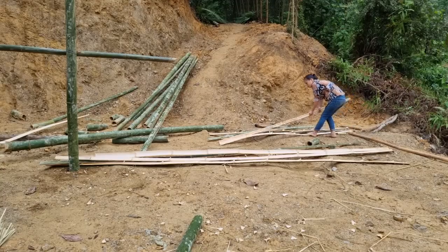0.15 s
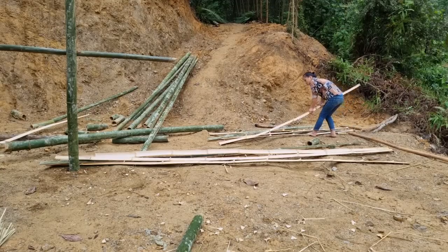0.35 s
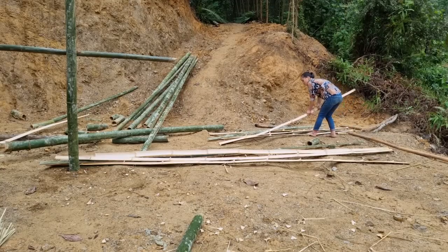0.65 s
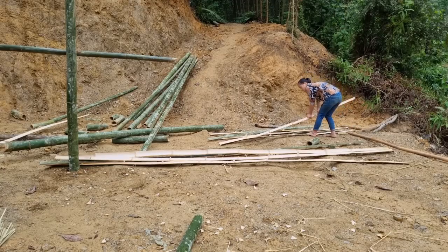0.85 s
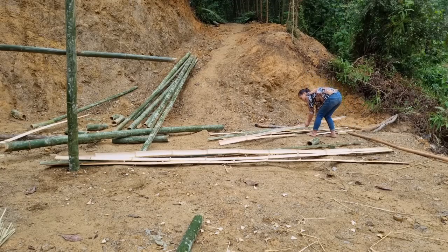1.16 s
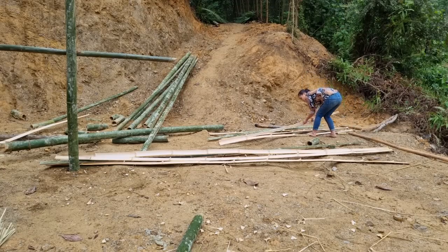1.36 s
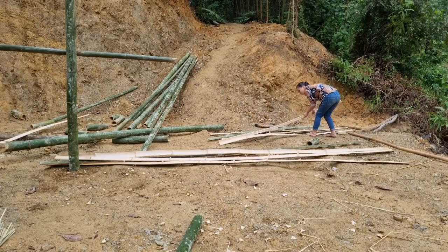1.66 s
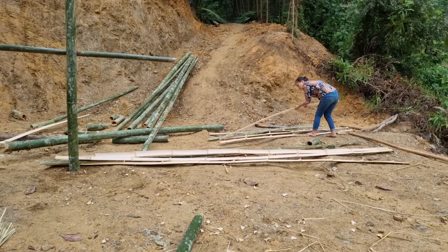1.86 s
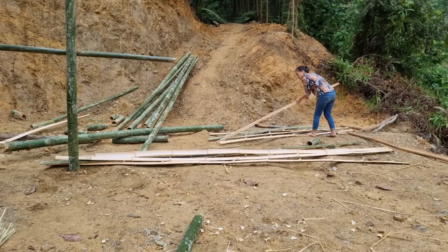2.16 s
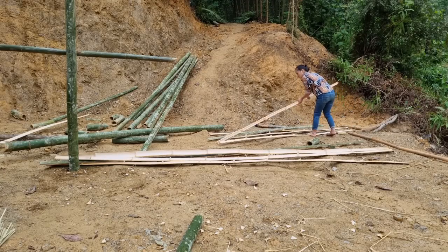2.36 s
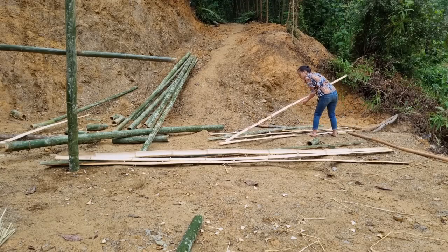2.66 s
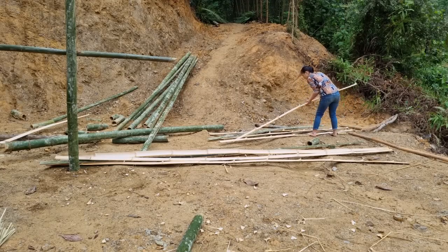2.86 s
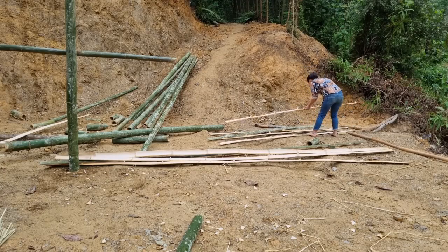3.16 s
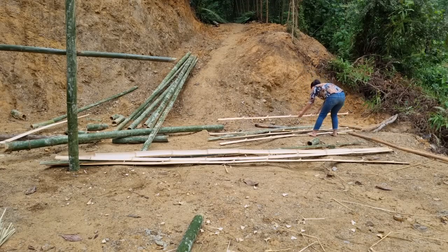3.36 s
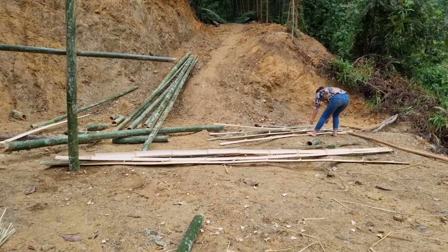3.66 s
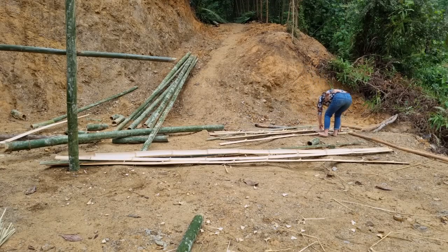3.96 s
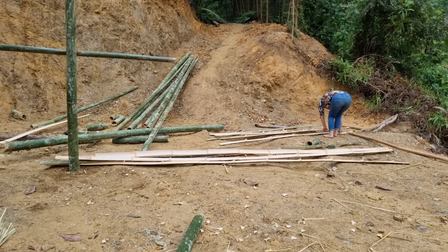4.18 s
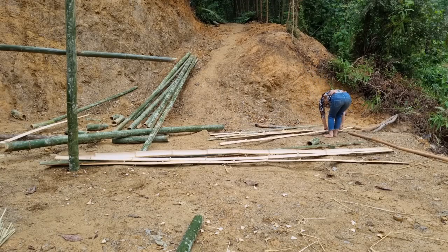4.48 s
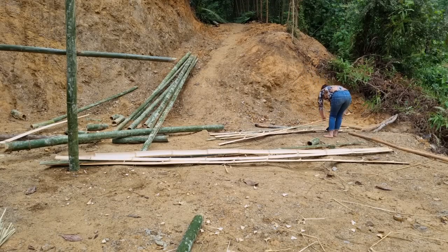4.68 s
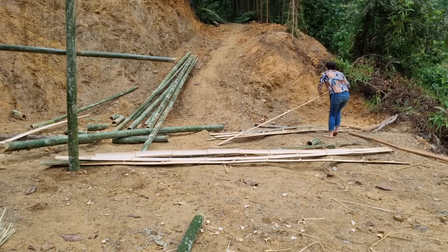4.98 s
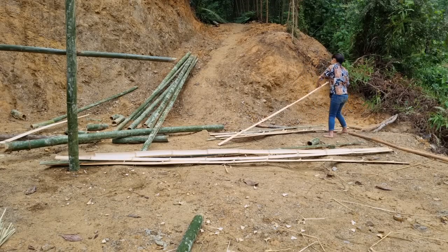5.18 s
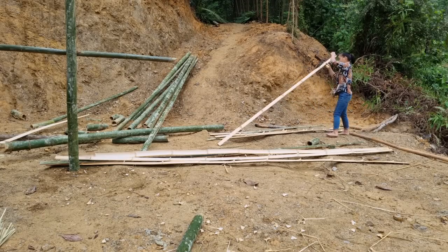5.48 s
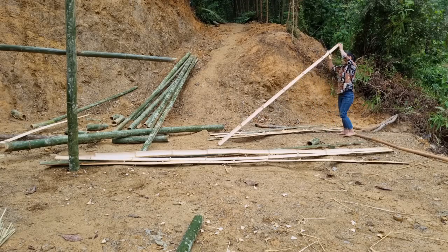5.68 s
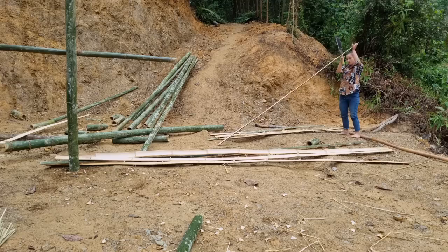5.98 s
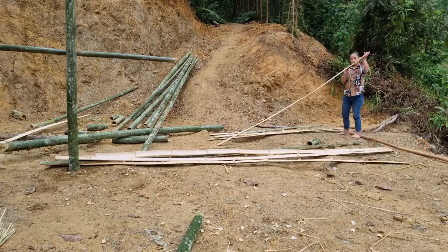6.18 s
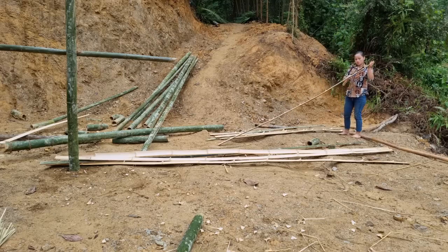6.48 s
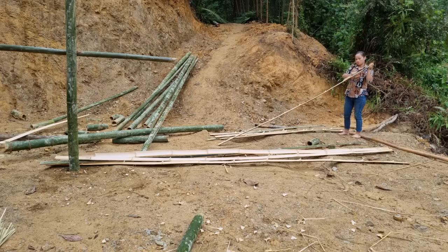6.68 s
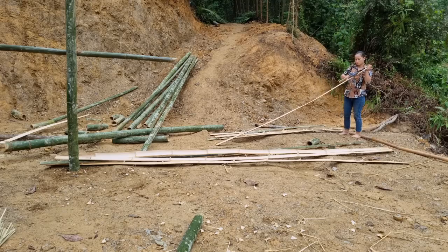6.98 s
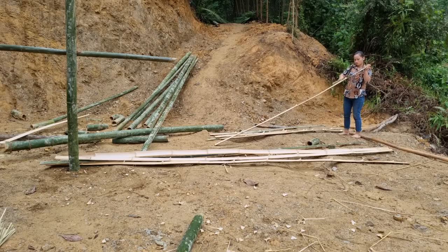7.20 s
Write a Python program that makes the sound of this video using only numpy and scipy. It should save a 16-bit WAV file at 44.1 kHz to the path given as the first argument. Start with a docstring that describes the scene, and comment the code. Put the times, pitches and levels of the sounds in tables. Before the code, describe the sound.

Split bamboo strips clatter onto a pile outdoors while a nearby hen clucks and whines over a faint hiss of insects.

```python
"""Insects hiss at a forest edge as a hen clucks close on the right and split bamboo clatters on a pile.
Each contact cracks, chatters and rings the cane; dropped strips also bounce, thud and flap on the earth.
The hen's clucks are uneven pulses through her throat, her whines nearly pure held notes with a rasp.
A far bird chips steadily and chicks peep in falling whistles. The yard adds scatter and a faint echo."""
import sys
import numpy as np
from scipy import signal
from scipy.fft import rfft, irfft, next_fast_len
from scipy.io import wavfile

SR = 44100
rng = np.random.default_rng(int(sys.argv[2]) if len(sys.argv) > 2 else 0)


def unload_wav(signal):
    """Save mono or channel-first audio to the path in sys.argv[1] as 16-bit WAV at rate SR, clipped to [-1, 1]."""
    wavfile.write(
        sys.argv[1],
        SR,
        np.round(np.clip(np.atleast_2d(signal).T, -1, 1) * 32767).astype(np.int16),
    )


N = 323694
TIME = np.arange(N) / SR


def from_db(db):
    """Decibels to gain."""
    return 10 ** (np.asarray(db) / 20)


def unit_rms(x):
    """Scale to rms 1."""
    return x / np.sqrt(np.mean(x ** 2) + 1e-20)


def at_hz(points, hz):
    """Read a table on a log-frequency axis."""
    f, value = np.transpose(points)
    return np.interp(np.log(np.maximum(hz, 1)), np.log(f), value)


def bump(x, centre, width):
    """Bell curve of height 1."""
    return np.exp(-((x - centre) / width) ** 2)


def add(out, start_s, x):
    """Mix x in at start_s."""
    i = round(start_s * SR)
    x, i = x[..., max(-i, 0):], max(i, 0)
    out[..., i:i + x.shape[-1]] += x[..., :max(N - i, 0)]


def colour(x, spectrum, modes=()):
    """Minimum-phase filter of unit power gain: a spectrum plus resonances."""
    size = 2 * next_fast_len(x.shape[-1] // 2 + 1)
    hz = np.fft.rfftfreq(size, 1 / SR)
    modes_db = sum(lift_db / (1 + (2 * (hz - f) / width_hz) ** 2) for f, width_hz, lift_db in modes)
    gain = unit_rms(from_db(at_hz(spectrum, hz) + modes_db))
    cepstrum = irfft(np.log(gain))
    cepstrum[1:size // 2] *= 2
    cepstrum[size // 2 + 1:] = 0
    return irfft(rfft(x, size) * np.exp(rfft(cepstrum)))[..., :x.shape[-1]]


def drift(rate_hz, size=N):
    """Smooth random curve, spread about 1."""
    knots = rng.standard_normal(size // 8 + 2)
    return np.interp(np.arange(size) * rate_hz / SR, np.arange(len(knots)), knots)


def stereo_noise(size, correlation):
    """White noise in two partly correlated channels."""
    mid, side = rng.standard_normal((2, size))
    return np.sqrt((1 + correlation) / 2) * mid + np.sqrt((1 - correlation) / 2) * side * [[1], [-1]]


def from_right(x, lag_ms, pan_db):
    """Sound from the right reaches the left later; pan_db is left minus right."""
    t = TIME[:len(x)]
    left = np.interp(t - lag_ms / 1000, t, x)
    return np.array([left * from_db(pan_db / 2), x * from_db(-pan_db / 2)])


# insect hiss and outdoor hush spectra: f/Hz, level/dB
INSECT_SPECTRUM = [(1300, -27), (1650, -16), (1950, -25), (2400, -3.5), (3200, -2), (5000, -5.5),
                   (5700, -1.5), (6500, -15), (8000, -10), (9200, -27.5), (15000, -24.5)]
HUSH_SPECTRUM = [(25, -22), (48, 4), (75, 7), (150, -4.5), (500, -12.5), (1100, -15), (2500, -10),
                 (8000, -24)]


def forest(insect_db=-59, hush_db=-75, flutter_db=0.84):
    """Insects all around, over a faint low hush."""
    hiss = colour(stereo_noise(N, .1), INSECT_SPECTRUM)
    insects = hiss * from_db(insect_db + flutter_db * drift(22)) * from_db([[-.8], [.8]])
    return insects + from_db(hush_db) * colour(stereo_noise(N, .61), HUSH_SPECTRUM)


# single clucks: t/s, length/s, f/Hz, level/dB, roughness/0-1
HEN_CLUCKS = [(.483, 0.058, 477, -39, 0.22), (1.112, 0.049, 380.7, -30.5, 0.24),
              (2.433, .051, 364, -35.5, 0.24), (3.175, 0.063, 442, -43.5, 0.52),
              (3.461, 0.071, 413, -43.5, 0.42), (4.072, 0.049, 382.3, -27, 0.38),
              (4.469, .064, 448.5, -44.5, 0.75), (5.49, 0.038, 363.4, -37, 0.71),
              (6.439, 0.089, 445, -55, 0.76)]
# throat response: f/Hz, level/dB
THROAT_SPECTRUM = [(150, -12), (380, -13), (750, -4.5), (1100, 10), (1450, -10.5), (1850, -25.5),
                   (3200, -14), (5000, -19.5), (8000, -25.5), (15000, -51.5)]


def clucks(arch=.1, sag=.11):
    """Uneven pulses through the throat: single clucks, a soft one before each whine, one at its end."""
    leads = [(s - .12, .074, 465.4, db - 12, .47) for s, _, _, db, *_ in HEN_WHINES]
    endings = [(s + held_s - .019, .0319, 464.6, db - 9.5, .416) for s, held_s, _, db, *_ in HEN_WHINES]
    out = np.zeros(N)
    for start_s, length_s, pitch_hz, level_db, roughness in list(HEN_CLUCKS) + leads + endings:
        progress = np.minimum(TIME[:SR // 8] / length_s, 1)
        effort = np.sin(np.pi * progress)
        jitter = .25 * roughness * drift(500, len(progress))
        hz = pitch_hz * (1 + arch * (effort - 1) - sag * (progress - .5) + jitter)
        phase = 2 * np.pi * np.cumsum(hz) / SR
        pulses = unit_rms(sum(np.cos(k * phase) for k in range(1, 14)))
        air = 1.1 * roughness * rng.standard_normal(len(progress)) * (1 + np.cos(phase))
        add(out, start_s, from_db(level_db) * unit_rms(colour(pulses + air, THROAT_SPECTRUM)) * effort)
    return out


# handling contacts: t/s, level/dB, rattle t60/s, body (under 800 Hz)/dB
STRIP_TAPS = [(.029, -31, 0.062, -13.5), (1.718, -28.5, .07, -21.5), (1.728, -27, 0.085, -17),
              (1.741, -14.5, 0.037, -23.5), (2.223, -47.5, 0.01, -14), (2.448, -31.5, 0.075, -6.5),
              (3.72, -45.5, 0.23, 3.5), (4.585, -51.5, 0.13, -17), (4.611, -50.5, 0.11, -21),
              (5.091, -53.5, 0.25, 5.5), (5.5, -57.5, 0.16, 8)]
# dropped strips: t/s, hit/dB, rattle t60/s, body/dB, slap delay/s, slap/dB, flap/dB, flap t60/s
STRIP_DROPS = [(1.746, -13, 0.087, -18, 0.016, -34, -40, 0.6),
               (2.114, -57.5, 0.093, -18, 0.0055, -66, -53, 0.32),
               (3.528, -20, 0.11, -9, 0.03, -21.5, -49, 2.56),
               (3.854, -36.5, .11, -6.5, .023, -28, -55.5, 0.97),
               (4.694, -66, 0.45, -6, 0.013, -68, -64.5, 0.8),
               (6.794, -23.5, 0.066, -12, .018, -30.5, -50, 0.32),
               (7.183, -23.5, 0.065, -13, 0.011, -32.5, -46, 0.27)]


def contacts(slap_body_db=-2.5, slap_t60_ratio=1.15, bounce_gap_s=.044, bounce_body_db=-1.5):
    """All contacts, in tap columns: a dropped strip lands on one end, slaps flat and bounces twice."""
    rows = list(STRIP_TAPS)
    for start_s, hit_db, t60_s, body_db, delay_s, slap_db, _, _ in STRIP_DROPS:
        rows.append((start_s, hit_db, t60_s, body_db))
        rows.append((start_s + delay_s, slap_db, t60_s * slap_t60_ratio, slap_body_db))
        for k, loss_db in enumerate((11, 19), 1):
            bounce_s = start_s + delay_s + bounce_gap_s * (k + rng.uniform(-.1, .09))
            rows.append((bounce_s, slap_db - loss_db, t60_s, bounce_body_db))
    return rows


# split cane resonances: f/Hz, width/Hz, lift/dB
CANE_MODES = [(1157, 260, 1), (1500, 450, -2), (2350, 150, 0), (3120, 250, 3.5), (3563, 250, -1.5),
              (4600, 270, 0), (5450, 300, 2.5), (7930, 460, 5)]


def bamboo(crack_gain=2.2, crack_s=.00099, rise_s=.00073, ring_width_hz=55, ring_db=6, pan_db=.3):
    """Each contact cracks, then the strips chatter; both ring the cane and the contact's bending modes."""
    out, t = np.zeros((2, N)), TIME[:SR // 4]
    for start_s, level_db, t60_s, body_db in contacts():
        splinter_db = -16 - .91 * body_db   # heavier contact, less top above 9 kHz
        chatter = unit_rms(from_db(3.5 * drift(600, len(t)))) * from_db(-60 * t / t60_s)
        crack = crack_gain * np.exp(-t / crack_s)
        bending_hz = np.geomspace(450, 7000, 16) * np.exp(rng.normal(0, .06, 16))
        bending = [(hz, ring_width_hz, ring_db) for hz in bending_hz]
        for force, top_db in (crack, splinter_db + 3), (chatter, splinter_db - 4):
            spectrum = [(20, body_db - 17), (70, body_db - 4), (280, body_db - 3), (450, body_db),
                        (750, body_db), (1200, -1.5), (8300, -1.5),
                        (9400, top_db), (16000, 1.5 * top_db - .5)]
            blow = stereo_noise(len(t), .3) * force * (1 - np.exp(-t / rise_s))
            add(out, start_s, from_db(level_db) * colour(blow, spectrum, CANE_MODES + bending))
    return out * from_db([[pan_db / 2], [-pan_db / 2]])


# held notes: t/s, length/s, f/Hz, level/dB, yelp/Hz, sag/Hz, overtones/dB, L-R/dB
HEN_WHINES = [(.133, 0.2, 590, -31, 19.5, 9.7, -45, -2.5), (2.753, 0.22, 588.6, -33, 48, 19, -48.5, 1.5),
              (4.028, .187, 586.2, -34, 2, 16.5, -42.5, 0), (6.768, 0.21, 587, -34.5, 3, 9.5, -51, -2.5),
              (7.208, 0.13, 590.2, -30, 6.5, 1, -44.5, -3.5)]
# upper harmonics: harmonic number, relative level/dB
WHINE_OVERTONES = [(3, -5), (4, 1), (5, -15), (6, -26), (8, -21.5), (12, -21)]


def whines(attack_s=.015, release_s=.048, yelp_at_s=.031, scoop_hz=28, scoop_s=.00763, jitter=.0028,
           crack_db=-5, fade_db_per_s=9.5, fundamental_db=-16, rasp_db=-19, shimmer_db=3):
    """A held note yelps, sags and recovers; the throat lifts harmonic 2, air rasps with each cycle."""
    out, t = np.zeros((2, N)), TIME[:SR // 4]
    for start_s, length_s, pitch_hz, level_db, yelp_hz, sag_hz, upper_db, pan_db in HEN_WHINES:
        remaining_s = np.maximum(length_s - t, 0)
        hz = pitch_hz + yelp_hz * bump(t, yelp_at_s, .011) - sag_hz * bump(t / length_s, .45, .212)
        hz -= scoop_hz * np.exp(-np.minimum(t, remaining_s) / scoop_s)   # flat at both ends
        phase = 2 * np.pi * np.cumsum(hz * (1 + jitter * drift(250.8, len(t)))) / SR
        effort = np.minimum(t / attack_s, 1) * np.minimum(remaining_s / release_s, 1)
        # the voice cracks atop the yelp, fully from 23 Hz of overshoot
        effort *= from_db(crack_db * min(yelp_hz / 23, 1) * bump(t, yelp_at_s, .0048))
        breath = from_db(level_db - fade_db_per_s * (t - length_s / 2))
        voice = breath * (from_db(fundamental_db) * np.sin(phase) + np.sin(2 * phase))
        overtones = sum(from_db(db + 2 * drift(40, len(t))) * np.sin(k * phase)
                        for k, db in WHINE_OVERTONES)
        voice += from_db(upper_db) * np.minimum(t / .052, 1) * overtones
        air = from_db(level_db + rasp_db) * rasp(phase)
        note = (np.sqrt(2) * voice + air) * effort * from_db(shimmer_db * drift(66.7, len(t)))
        add(out, start_s, from_right(note, lag_ms=.59, pan_db=pan_db))
    return out


# air in the hen's voice: f/Hz, level/dB
RASP_SPECTRUM = [(300, -15), (1200, 0.5), (1900, -4.5), (3000, 0.5), (5000, -3), (7300, -6.5),
                 (9000, -14.5), (15000, -22)]


def rasp(phase, onset_db=8, settle_s=.022):
    """Breath noise pulsed by the voice; starts rough and settles."""
    t = TIME[:len(phase)]
    puffs = rng.standard_normal(len(t)) * (1 + .39 * np.sin(phase))
    return from_db(onset_db * np.exp(-t / settle_s)) * colour(puffs, RASP_SPECTRUM)


def whistle(glide_s, start_hz, end_hz, waver=.008, hold_s=0):
    """A wavering note eases from its first pitch to its last and may hold it."""
    t = TIME[:SR // 2]
    ease = (1 - np.cos(np.pi * np.minimum(t / glide_s, 1))) / 2
    hz = (start_hz + (end_hz - start_hz) * ease) * (1 + waver * drift(300, len(t)))
    swell = np.abs(np.sin(np.pi * np.minimum(t / (glide_s + hold_s), 1)))
    return np.sqrt(2 * swell) * np.sin(2 * np.pi * np.cumsum(hz) / SR)


def far_bird(level_db=-62, count=21, first_s=.378, gap_s=.3305, slowing_s=.00058):
    """One quick falling chip repeats, each gap slightly longer."""
    out = np.zeros(N)
    for k in range(count):
        chip = whistle(glide_s=.048, start_hz=5250, end_hz=3600)
        add(out, first_s + k * gap_s + slowing_s * k * k / 2, from_db(level_db) * chip)
    return out


# chick peeps: t/s, glide/s, start f/Hz, level/dB
CHICK_PEEPS = [(0.704, .11, 3460, -56.5), (1.179, 0.086, 3570, -56), (1.964, 0.13, 3040, -62),
               (2.517, .1, 3480, -54.5), (2.849, 0.12, 3880, -55.5), (4.24, 0.12, 3600, -57),
               (4.596, 0.15, 3650, -57.5)]


def chicks(end_hz=2123):
    """Each peep glides down, then holds its last pitch."""
    out = np.zeros(N)
    for start_s, glide_s, start_hz, level_db in CHICK_PEEPS:
        add(out, start_s, from_db(level_db) * whistle(glide_s, start_hz, end_hz, waver=.035, hold_s=.035))
    return out


# stray thin notes: t/s, length/s, start f/Hz, end f/Hz, level/dB
THIN_NOTES = [(0.773, 0.2, 4924, 4900, -66), (4.328, 0.033, 1633, 1451, -54),
              (5.807, .016, 1528, 1690, -53)]


def thin_notes():
    """One faint steady high tone and two short low pips."""
    out = np.zeros(N)
    for start_s, length_s, start_hz, end_hz, level_db in THIN_NOTES:
        add(out, start_s, from_db(level_db) * whistle(length_s, start_hz, end_hz))
    return out


# flapping strip and earth thud spectra: f/Hz, level/dB
FLAP_SPECTRUM = [(25, -16), (50, -21), (82, -6), (115, -11), (200, -20), (600, -39)]
THUD_SPECTRUM = [(25, -59.5), (55, -19.5), (110, -13.5), (170, -1.5), (280, -11), (480, -14.5), (1200, -41)]


def flapping(lead_s=.0066, swing_rise_s=.025, thud_rise_s=.0047, thud_db=-1, thud_t60_ratio=.43):
    """A dropped strip thuds on the earth; its lowest bending wave builds later and drums on longer."""
    swing, thud, t = np.zeros(N), np.zeros(N), TIME[:SR]
    for start_s, _, _, _, delay_s, _, level_db, t60_s in STRIP_DROPS:
        touch_s = start_s + delay_s - lead_s   # just before the slap
        add(swing, touch_s, from_db(level_db - 60 * t / t60_s) * (1 - np.exp(-t / swing_rise_s)))
        thud_decay = from_db(level_db + thud_db - 60 * t / (t60_s * thud_t60_ratio))
        add(thud, touch_s, thud_decay * (1 - np.exp(-t / thud_rise_s)))
    drumming = swing * colour(stereo_noise(N, .91), FLAP_SPECTRUM, modes=[(77, 28, 6.6)])
    earth = thud * colour(rng.standard_normal(N), THUD_SPECTRUM)
    return (drumming + earth) * from_db([[1], [-1]])


# echo decay: f/Hz, t60/s
YARD_T60 = [(80, .7), (500, 0.83), (1200, 0.44), (3000, 0.71), (7000, 0.42), (14000, 0.093)]


def yard(x, near_db, far_db, near_t60_s=.15, build_s=.06):
    """Adds quick scatter off ground and pile, and an echo off bank and trees, shorter in the treble."""
    t, response = TIME[:SR], 0
    near = from_db(near_db) * unit_rms(from_db(-60 * t / near_t60_s))
    edges_hz = np.geomspace(40, 18000, 10)
    for low_hz, high_hz in zip(edges_hz, edges_hz[1:]):
        bandpass = signal.butter(2, [low_hz, high_hz], "band", fs=SR, output="sos")
        band = signal.sosfilt(bandpass, stereo_noise(SR, 1 / (1 + (low_hz / 600) ** 2)))
        t60_s = at_hz(YARD_T60, np.sqrt(low_hz * high_hz))
        far = from_db(-60 * t / t60_s) * (1 - np.exp(-t / build_s)) ** 2
        response = response + band * (near + from_db(far_db) * unit_rms(far))
    return x + signal.fftconvolve(x, response / np.sqrt(SR), axes=1)[:, :N]


def scene():
    """The near hen is almost dry; bamboo, small birds and thin notes carry more of the yard."""
    clucking = yard(from_right(clucks(), lag_ms=.48, pan_db=-1.5), near_db=-8.5, far_db=-28.5)
    clatter = yard(bamboo(), near_db=-5, far_db=-18.5)
    whining = yard(whines(), near_db=-13, far_db=-25)
    whistles = from_right(far_bird() + chicks() + thin_notes(), lag_ms=.25, pan_db=1.5)
    whistling = yard(whistles, near_db=0, far_db=-18.5)
    return forest() + clucking + clatter + whining + whistling + flapping()


def record(dry):
    """Steep low-pass at 16 kHz."""
    return signal.sosfilt(signal.ellip(10, .2, 80, 16000, fs=SR, output="sos"), dry)


dry = scene()
out = record(dry)
unload_wav(out)
```